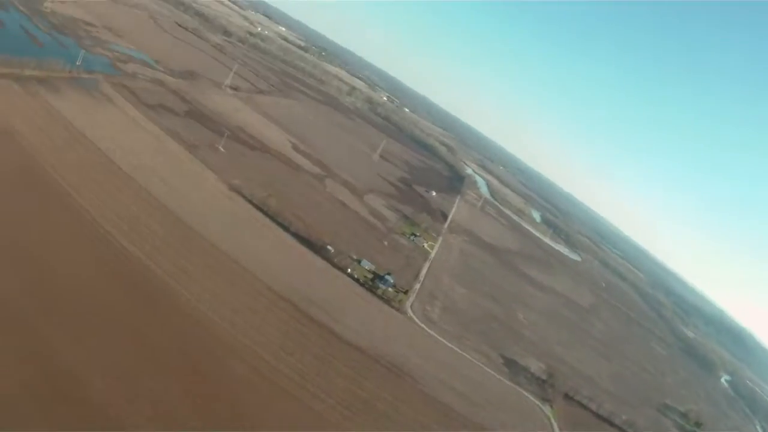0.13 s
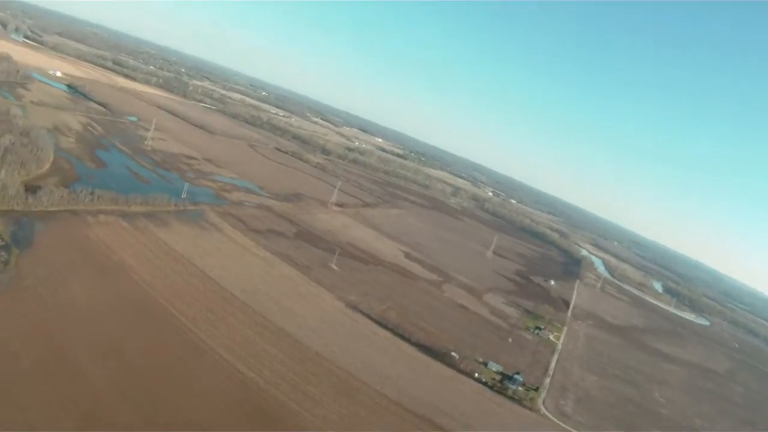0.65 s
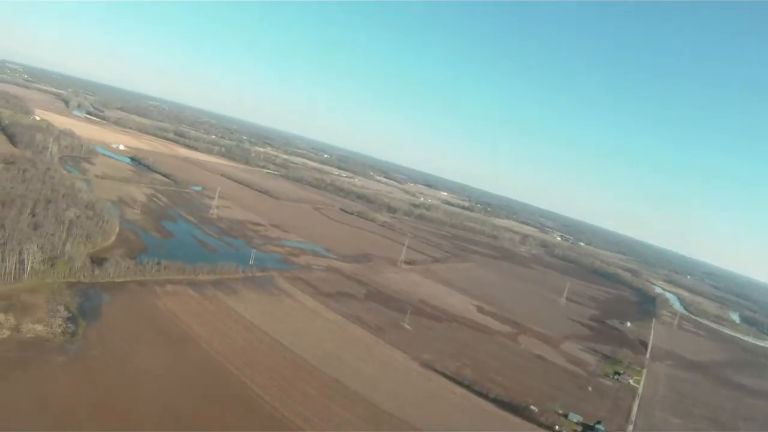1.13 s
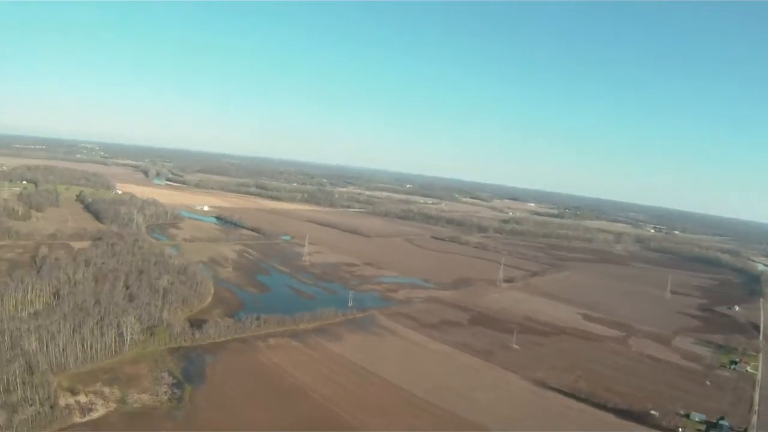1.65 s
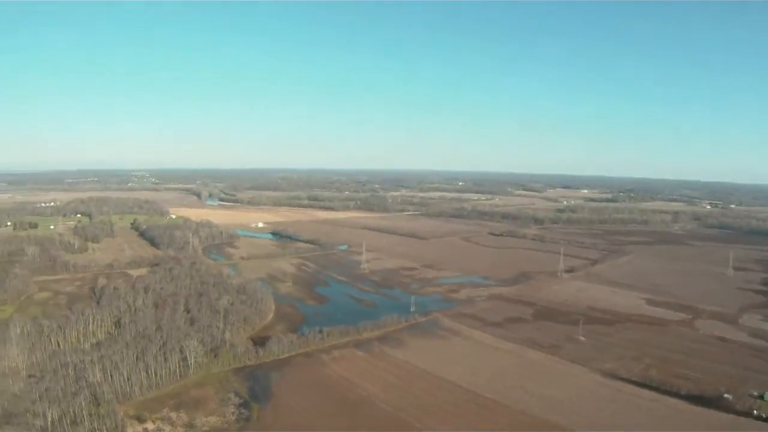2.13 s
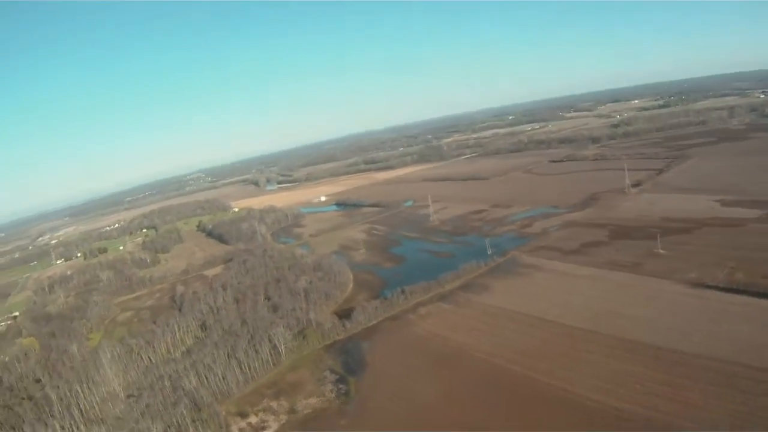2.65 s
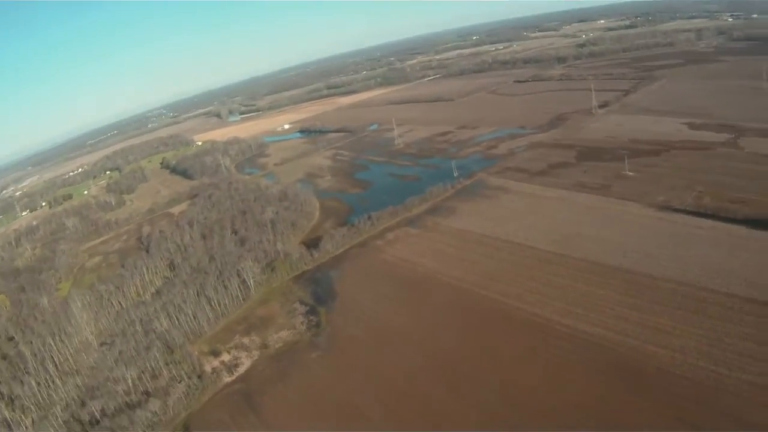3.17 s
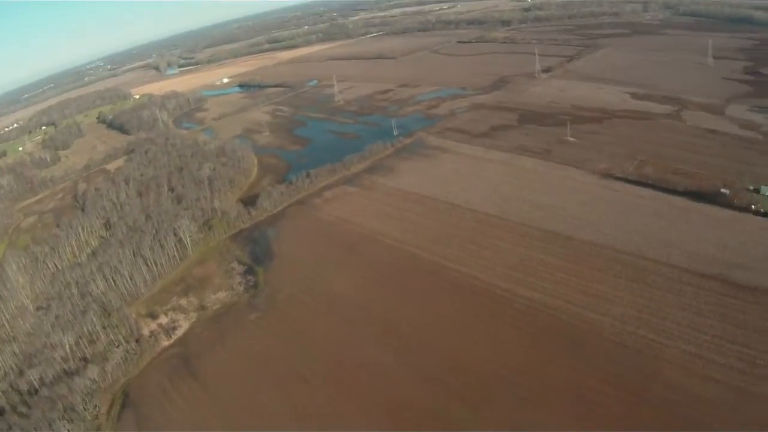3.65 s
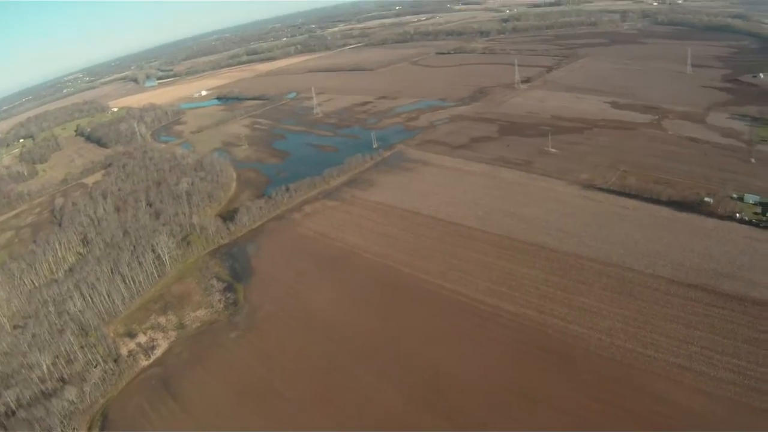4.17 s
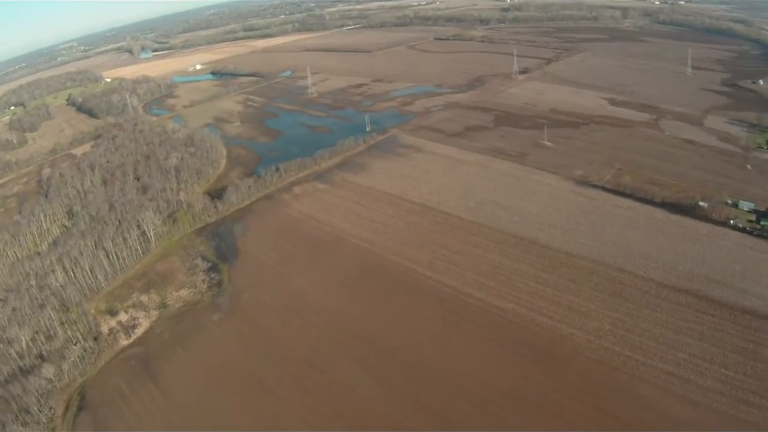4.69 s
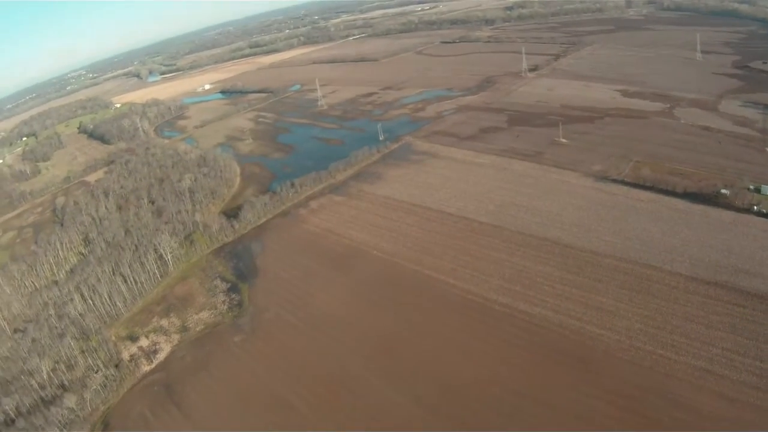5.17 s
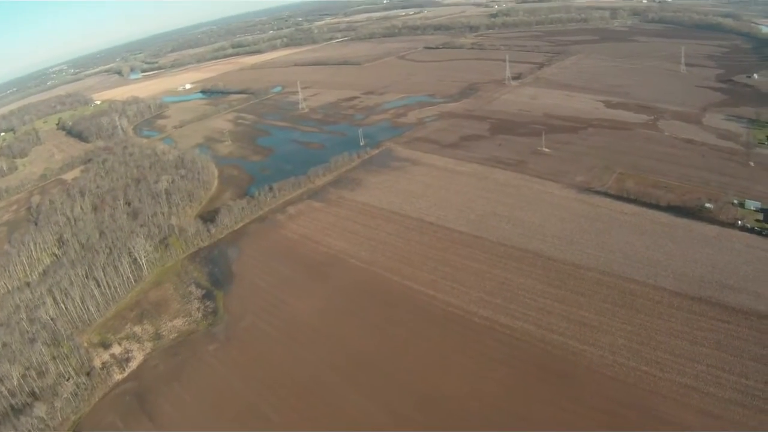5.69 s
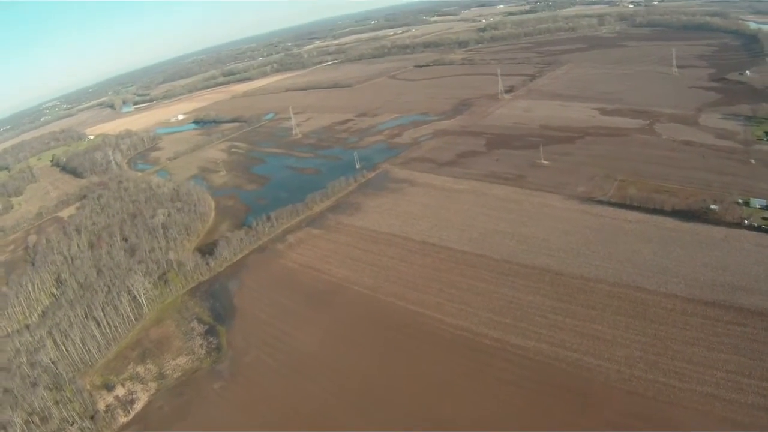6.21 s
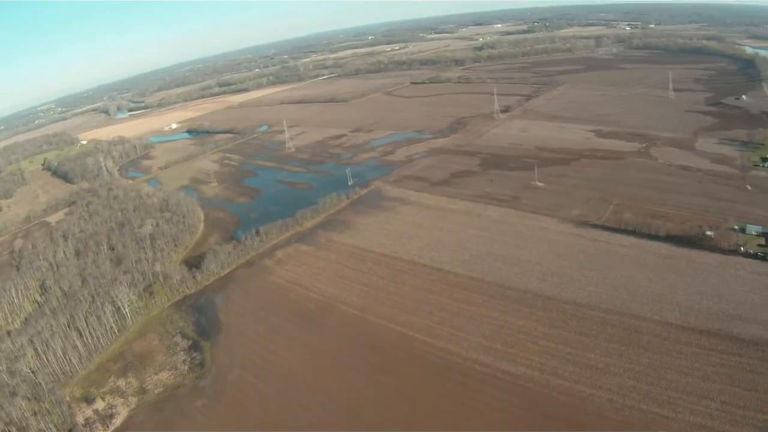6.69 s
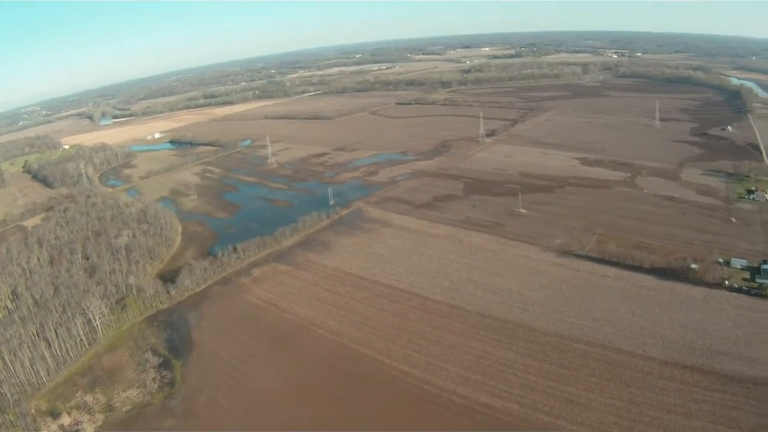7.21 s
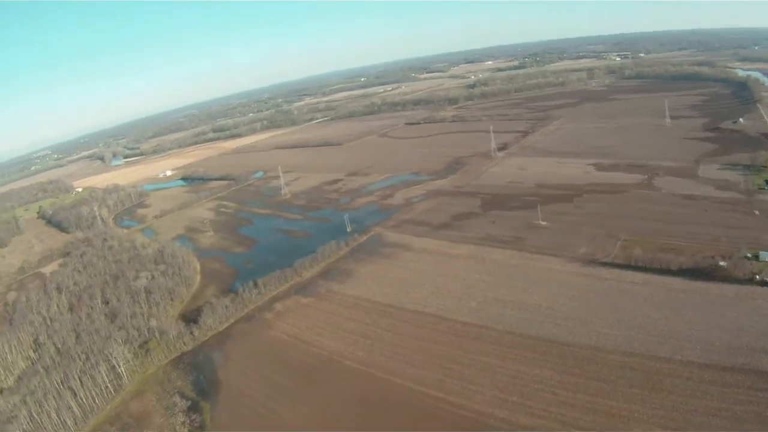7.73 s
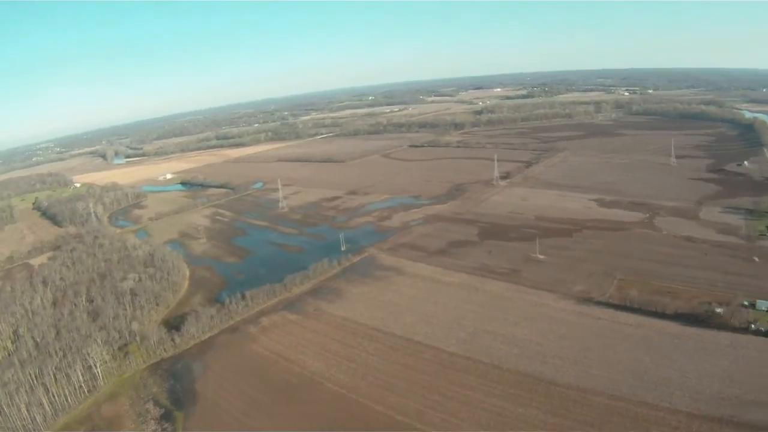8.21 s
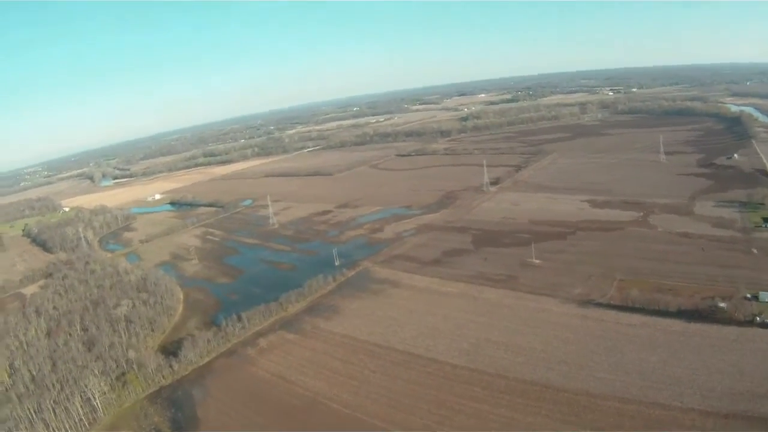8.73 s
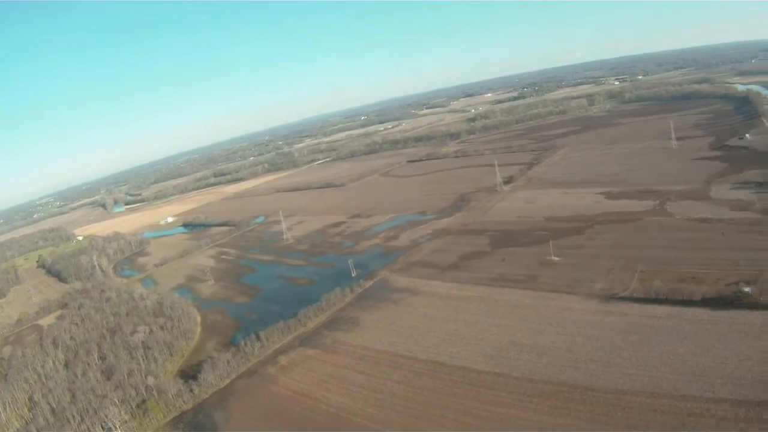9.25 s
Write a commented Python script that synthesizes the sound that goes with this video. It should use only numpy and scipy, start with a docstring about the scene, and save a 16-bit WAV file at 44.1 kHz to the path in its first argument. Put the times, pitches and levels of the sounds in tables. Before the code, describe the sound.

A close, continuous electric propeller drone, carried through the body of a model aircraft high over open fields. The buzzing whine starts highest, slides down, settles, and slowly rises again, easing slightly at the end. Patchy air wash and low wing buffeting thin out and return. Faint gliding controller tones and four tiny knocks colour the gritty, nearly mono sound of a small camera microphone.

```python
"""A small model plane in flight, heard by a camera fixed to its foam body.
The motor starts high and sinks for three seconds while the rush of air fades, then both slowly build up
again until near the end, when they ease. Four small knocks come at about 1.7, 3.7, 4.5 and 8.8 s.
A 14-magnet motor turns a two-blade propeller: sines locked to the shaft, with faint gliding tones from
the speed controller. Shaped noise makes the propeller wash, the buffeting of the wing and the knocks."""
import sys
import numpy as np
from scipy import signal
from scipy.io import wavfile
from scipy.ndimage import uniform_filter1d

SR = 44100
rng = np.random.default_rng(int(sys.argv[2]) if len(sys.argv) > 2 else 0)


def how_loud(loudness_db):
    """Turn decibels into a plain amplitude multiplier (0 dB gives 1, 20 dB gives 10)."""
    steps = np.asarray(loudness_db, float) / 20
    return 10 ** steps


def unload_wav(signal):
    """Save mono or channel-first audio to the path in sys.argv[1] as 16-bit WAV at rate SR, clipped to [-1, 1]."""
    wavfile.write(
        sys.argv[1],
        SR,
        np.round(np.clip(np.atleast_2d(signal).T, -1, 1) * 32767).astype(np.int16),
    )


N = 412776  # length in samples
CALM_DB, STRONG_DB = -37, -28  # wash levels that count as calm and as strong


def evened(x):
    """Scales a sound to an rms of 1."""
    return x / np.sqrt(np.mean(x ** 2) + 1e-20)


def curve(rows):
    """Joins (seconds, value) rows by straight lines, one value a sample."""
    seconds, values = np.transpose(rows)
    return np.interp(np.arange(N) / SR, seconds, values)


def wobble(count, hz):
    """Slow random drift: hz new random values a second, joined by lines, one row per voice."""
    knots = np.arange(0, N + SR, SR / hz)
    rows = rng.standard_normal((count, len(knots)))
    return [np.interp(np.arange(N), knots, row) for row in rows]


# Small knocks in the body. Each row: start in seconds, level in dB.
KNOCK_TIMES = [(1.7005, -21), (3.7494, -32), (4.5494, -29), (8.8494, -30)]


def knocks():
    """Each knock is a few milliseconds of fading noise, kept between 1800 and 3700 Hz."""
    length = 600  # samples
    t, out = np.arange(length) / SR, np.zeros(N + length)
    bursts = rng.standard_normal((len(KNOCK_TIMES), length))
    for (start, db), noise in zip(KNOCK_TIMES, bursts):
        fade_db = 60 * t / .03  # falls at 60 dB in 30 ms
        first = round(start * SR)
        out[first:first + length] += how_loud(db + 6 - fade_db) * noise
    band = signal.butter(2, [1800, 3700], "band", fs=SR, output="sos")
    return signal.sosfilt(band, out[:N])


def buffeting(wash_db):
    """Lumpy low shaking of the wing: noise rings one low resonance, harder as the wash grows."""
    ring_hz, width_hz = 40.3, 5.6
    calm_level_db, growth, top_db = -40, 1.67, -29.5  # growth: dB gained for each dB of wash
    level_db = np.minimum(calm_level_db + growth * (wash_db - CALM_DB), top_db)
    r = np.exp(-np.pi * width_hz / SR)
    ring = [1, -2 * r * np.cos(2 * np.pi * ring_hz / SR), r * r]
    shake = signal.lfilter([1, -1], ring, rng.standard_normal(N))
    low_pass = signal.butter(2, 70, fs=SR, output="sos")
    return how_loud(level_db) * evened(signal.sosfilt(low_pass, shake))


# Strength of the propeller wash over time. Each row: time in seconds, level in dB.
WASH_STRENGTH = [(0.0, -27.5), (1.6, -32), (2.2, -35), (3.8, -37), (4.9, -34), (6.0, -33), (7.3, -32.5),
                 (7.85, -31), (8.5, -33.5), (9.36, -33.5)]


def wash_strength():
    """The rush of air swells and fades along straight lines in dB."""
    return curve(WASH_STRENGTH)


# Colour of the wash heard through the body. Each row: frequency in Hz, dB over the wash level when calm,
# dB over the wash level when strong.
WASH_COLOUR = [(60, -23, -9), (130, -3, -5), (213, -5, -7), (308, -21.5, -23.5), (587, -12, -15.5),
               (806, -12.5, -13), (1022, 1, -2.5), (1280, -2.5, -11), (1565, -4, -3), (1830, -5.5, -8.5),
               (2370, -6, -4.5), (2555, -18, -12.5), (3730, -20, -24.5), (4340, -30.5, -27.5),
               (5820, -41, -36)]


def wash(level_db, turns):
    """Patchy noise whose colour shifts with its strength; its middle band rasps with the shaft turns."""
    frames, hz = N // 256 + 5, np.fft.rfftfreq(1024, 1 / SR)
    real, imaginary, patches = rng.standard_normal((frames, 513, 3)).T
    patches = uniform_filter1d(patches, size=10, axis=0)
    patches = evened(uniform_filter1d(patches, size=10, axis=1))
    f, calm, strong = np.transpose(WASH_COLOUR)
    calm = np.interp(np.log(hz + 1), np.log(f), calm)[:, None]
    strong = np.interp(np.log(hz + 1), np.log(f), strong)[:, None]
    frame_db = np.interp(np.arange(frames) * 256, np.arange(N), level_db)
    share = np.clip((frame_db - CALM_DB) / (STRONG_DB - CALM_DB), 0, 1)  # 0 calm, 1 strong
    colour_db = calm + share * (strong - calm)
    spectrum = (real + 1j * imaginary) * how_loud(colour_db + frame_db + 1.1 * patches)
    middle = np.exp(-(np.log((hz[:, None] + 1) / 1700) / 0.33) ** 2)  # a hump around 1700 Hz
    noise, rasp = signal.istft([spectrum, spectrum * middle], nperseg=1024, noverlap=768)[1][:, :N]
    throb = .4 * np.cos(turns + .9) + .1 * np.cos(2 * turns) + .1 * np.cos(3 * turns)
    return noise + rasp * throb


# Beats of the controller's chopping with multiples of the 42 commutations a turn, each loudest near one
# pitch. Each row: shaft order, top rms level in dB, loudest pitch in Hz, Hz away where it is 20 dB down.
CHOPPING_BEATS = [(42, -59, 4675, 170), (84, -27.5, 1090, 400), (126, -33, 2030, 450)]


def controller(speed, turns):
    """Speed controller: difference tones that glide against the motor's pitch."""
    chop_hz = 8013  # chopping rate
    chop = 2 * np.pi * chop_hz * np.arange(N) / SR
    out = np.zeros(N)
    for order, top_db, loudest_hz, width_hz in CHOPPING_BEATS:
        pitch = abs(chop_hz - order * speed)
        level_db = top_db - 20 * ((pitch - loudest_hz) / width_hz) ** 2
        out += how_loud(level_db) * np.cos(chop - order * turns)
    return np.sqrt(2) * out


# Speed of the motor over time. Each row: time in seconds, shaft turns per second.
SHAFT_SPEED = [(0.0, 91.1), (0.25, 89.99), (0.65, 88.57), (1.65, 81.64), (1.95, 79.96), (2.8, 76.97),
               (2.95, 76.6), (3.55, 76.66), (4.05, 77.49), (4.55, 78.54), (4.9, 79.82), (5.4, 80.33),
               (5.8, 82.12), (5.95, 82.48), (6.35, 82.61), (7.25, 83.38), (8.2, 83.66), (9.0, 81.54),
               (9.35, 80.75)]


def shaft_speed():
    """The shaft speeds up and slows down along straight lines."""
    return curve(SHAFT_SPEED)


# Resonances of the body, which the orders cross as the speed changes.
# Each row: frequency in Hz, width in Hz, peak level in dB.
BODY_RESONANCES = [(174.3, 21.8, -2), (241.4, 24.6, 7.0), (356.5, 11.6, 1.3), (491, 35, -4),
                   (619, 14.4, 2.5), (859.3, 19, 6), (992, 76, 2.5), (1101, 107, -1.5), (1216.6, 32, -4.2),
                   (1488, 32, -0.5), (1563, 68, 2.5), (1740, 15, -5), (1923, 15, -10.5), (2120, 113, -0.9),
                   (2340, 44, 1.5), (2890, 70, -2.5), (3323, 246, 2)]


def body_db(hz):
    """Level at a moving frequency: the powers of all the resonances added up."""
    power = sum(how_loud(db) ** 2 / (1 + (2 * (hz - f) / width) ** 2) for f, width, db in BODY_RESONANCES)
    return 10 * np.log10(power)


# Sines at multiples ("orders") of the shaft speed, before the body resonances: 1 imbalance,
# 2 blade passing, 12 stator slots, 14 magnets, 42 commutation.
# Each row: order, rms level in dB at cruise, dB gained per Hz of shaft speed.
SHAFT_ORDERS = [(1.0, -16.0, 0.3), (2.0, -18.5, 0.12), (3.0, -40.0, 1), (4.0, -41, 0.32),
                (6.0, -34.0, -0.2), (7.0, -47, 0.73), (8.0, -45.5, 1.6), (10.0, -40.5, -0.7),
                (11.0, -36, 0.1), (12.0, -23.5, -0.09), (13.0, -23, 0.19), (14.0, -15.5, -0.05),
                (15.0, -27.5, 0.17), (16.0, -29, 0.39), (17.0, -28, 0.57), (18.0, -33.5, -0.29),
                (19.0, -34, 0.46), (20.0, -33.5, 0.65), (21.0, -36.5, 1), (22.0, -34, 0.04),
                (23.0, -33.5, -0.6), (24.0, -32.5, -0.9), (25.0, -32.5, -0.2), (26.0, -42.5, 0.67),
                (27.0, -40.5, 0.2), (28.0, -40.5, 0.04), (29.0, -43.0, 1), (30.0, -40.5, 0.1),
                (35.0, -47.5, 0.9), (36.0, -46, -0.66), (42.0, -44, 0.53)]


def motor(speed, turns):
    """Motor and propeller: sines locked to the shaft, bunched into one push a turn."""
    cruise_hz = 82  # shaft speed at which the order levels hold
    hum_lag = 1.497  # radians per order by which the low hum trails the push
    # Order 13 trails most (radians) at one shaft speed and less per Hz away, where the push is sharper.
    lag_most, lag_at_hz, lag_fall = 1.45, 78.5, .125
    lag = np.maximum(lag_most - lag_fall * abs(speed - lag_at_hz), 0)
    out, coarse = np.zeros(N), np.arange(0, N, 441)
    drifts = wobble(count=len(SHAFT_ORDERS), hz=12)
    for (order, cruise_db, gain_db), drift in zip(SHAFT_ORDERS, drifts):
        k = round(order)
        resonance_db = np.interp(np.arange(N), coarse, body_db(k * speed[coarse]))
        level_db = cruise_db + gain_db * (speed - cruise_hz) + resonance_db
        # Faint orders are less steady, except the 42nd.
        waver_db = .6 + .03 * np.clip(-20 - level_db, 0, 20) * (k != 42)
        spread = (.06 if k < 18 else .2) * (k - 13) ** 2  # the treble of the push is smeared most
        # Late 11th and 13th orders trade pulsing for warble.
        late = lag * ((k == 13) + 1.7 * (k == 11)) + k * hum_lag * (k < 10)
        out += how_loud(level_db + waver_db * drift) * np.cos(k * turns + spread - late)
    return np.sqrt(2) * out


def scene():
    """Everything reaches the one microphone through the body, so both sides start out alike."""
    speed, wash_db = shaft_speed(), wash_strength()
    turns = 2 * np.pi * np.cumsum(speed) / SR  # shaft angle in radians
    background = knocks() + buffeting(wash_db) + wash(wash_db, turns)
    mix = background + controller(speed, turns) + motor(speed, turns)
    return np.array([mix, mix])


def band_limit(x):
    """A steep low-pass at the top of the band."""
    return signal.sosfilt(signal.butter(12, 15330, fs=SR, output="sos"), x)


def record(dry):
    """Camera: held samples mirror the sound around 12 kHz; resampling folds a fainter mirror to 8.1 kHz."""
    camera_sr = 12000  # samples a second
    squeezed = 2 * np.tanh(dry[0] / 2)  # the preamp rounds off the tallest peaks
    held = np.repeat(signal.resample_poly(squeezed, camera_sr, SR), 4)
    # straight-line resampling back to SR
    line = np.interp(np.arange(N) * 4 * camera_sr / SR, np.arange(len(held)), held)
    band = signal.butter(2, [300, 1300], "band", fs=SR, output="sos")
    middle = signal.sosfilt(band, line)
    # a faint trace of the middle band, randomly scaled, added left and subtracted right
    side_trace = how_loud(-34.5) * middle * wobble(count=1, hz=40)[0]
    return band_limit(np.array([line + side_trace, line - side_trace]))


dry = scene()
out = record(dry)
unload_wav(out)
```